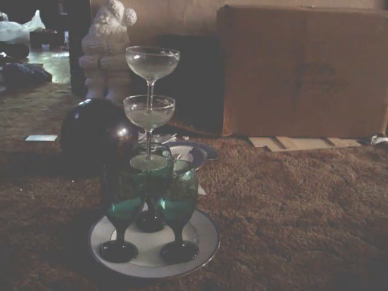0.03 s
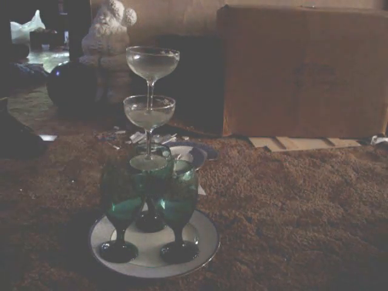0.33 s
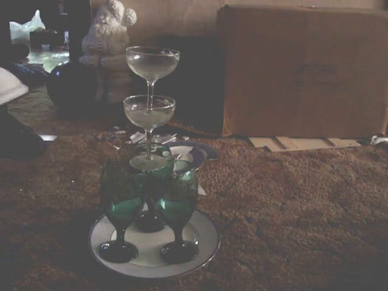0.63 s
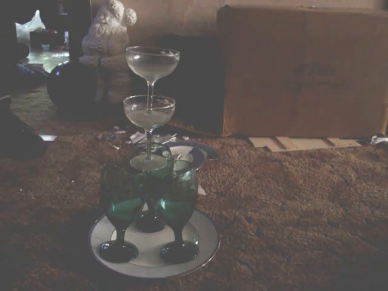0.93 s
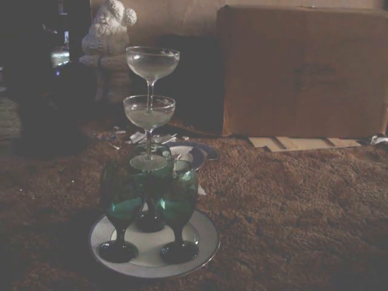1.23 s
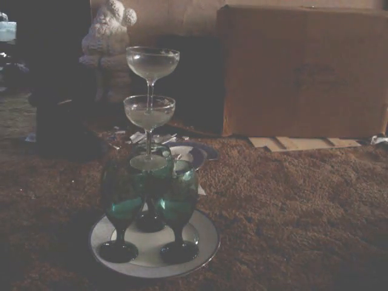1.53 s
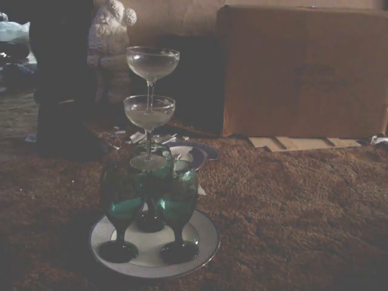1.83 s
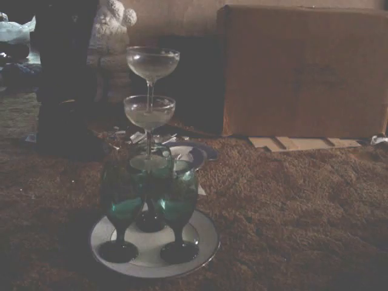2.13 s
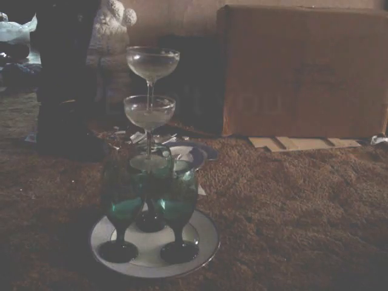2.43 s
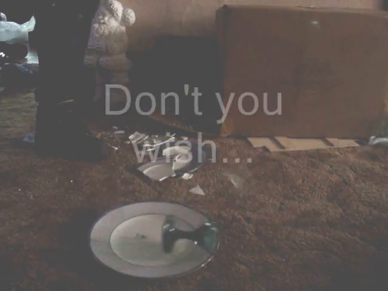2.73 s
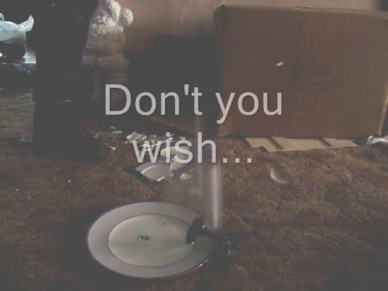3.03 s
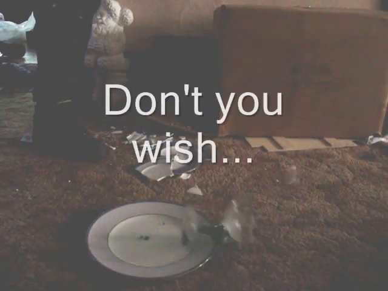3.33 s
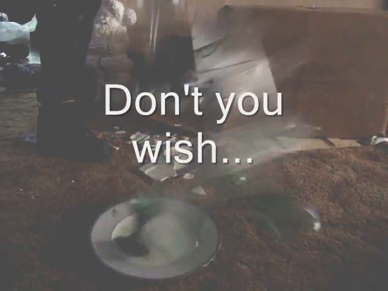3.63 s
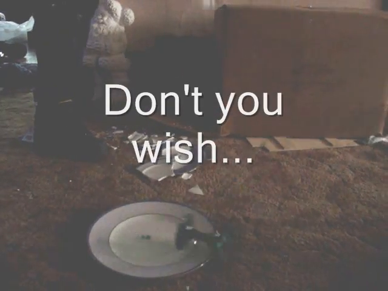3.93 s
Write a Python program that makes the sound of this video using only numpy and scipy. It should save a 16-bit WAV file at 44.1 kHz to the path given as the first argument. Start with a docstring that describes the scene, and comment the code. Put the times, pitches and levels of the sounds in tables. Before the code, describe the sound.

Glasses shatter loudly on a plate in a small, dry room, following a quiet stretch with light knocks and rustling. Ringing glass, splinters and dull thuds distort the microphone, then stop abruptly before the same smash repeats.

```python
"""A quiet, carpeted room: a soft knock and a shuffle, then a heavy blow scatters a stack of drinking
glasses on a plate. The glasses collide and ring in their own modes, shards ping, splinters shower
down as tiny damped rings, and heavy pieces thud onto carpet and plate. The smash overloads the
microphone; it is then cut off and starts again from the blow."""
import sys
import numpy as np
from scipy import signal
from scipy.fft import rfft, irfft, next_fast_len
from scipy.io import wavfile
from scipy.ndimage import map_coordinates

SR = 44100
rng = np.random.default_rng(int(sys.argv[2]) if len(sys.argv) > 2 else 0)


def wrap_up_sound(samples):
    """Save the sound to the file named by the first command line argument, as 16-bit audio."""
    columns = np.atleast_2d(samples).T
    # keep every value between -1 and 1, then stretch to whole-number steps
    tamed = np.clip(columns, -1, 1)
    steps = np.round(tamed * 32767).astype(np.int16)
    wavfile.write(sys.argv[1], SR, steps)


N = 176400

BLOW_S, CUT_S, TOP_HZ = 2.6243, 3.6625, 16000
RING_RISE_S, THUD_RISE_S = .0006, .004
CLICK_DB, CLICK_T60_S = -5, .03  # the hard edge of a contact, relative to its level
CHATTER, SHARD_CHATTER, CHATTER_PER_S = .34, .55, 115  # depths and rate of the rattle in a ring

# The bright crack of glass, also heard in every click. Each row: frequency in Hz, level in dB.
CRACK_COLOUR = [(40, -10), (1000, -3), (7000, 1), (15000, -2)]
# The low push of air under it. Each row: frequency in Hz, level in dB.
PUFF_COLOUR = [(30, 0), (70, -7), (200, -15), (800, -28)]


def blow():
    """A light touch, then the crash that breaks the stack, with a low push of air."""
    touch = strike(2.62, db=-20, rise=THUD_RISE_S, t60=.09)
    crash = strike(BLOW_S, db=0, rise=RING_RISE_S, t60=.09)
    puff = strike(BLOW_S, db=-20, rise=THUD_RISE_S, t60=.35)
    return (touch + crash) * noise(CRACK_COLOUR) + puff * noise(PUFF_COLOUR)


# The voice of each glass. Each row: glass number, pitch in Hz, level in dB, 60 dB decay in seconds.
GLASS_MODES = [(0, 937, 0, .28), (0, 2295, -3, .28), (0, 5480, -11, .18), (1, 1760, -1.5, .55),
               (1, 1837, -4, .55), (2, 1005, -5, 1.3), (2, 1175, -2, .65), (2, 2718, -1, .5),
               (2, 3278, -2, .6), (2, 3388, -1, .35), (2, 5048, -5, .24), (2, 6062, -4, .45),
               (2, 8370, -9, .35), (3, 2531, -1, .45), (3, 3285, -7, .3), (3, 4067, -1, .35),
               (4, 1440, -14, 1.1), (4, 4111, -1, .17), (4, 7175, -9, .2), (5, 2837, -5, .45),
               (5, 2877, -1, .55), (5, 2992, -11, .6), (5, 4320, 1, .3), (5, 7612, -10, .25),
               (5, 7845, -9, .25)]
# The collisions. Each row: start in seconds, glass number, level in dB.
CLINKS = [(2.653, 3, -9), (2.665, 0, -3), (2.70, 0, -3), (2.705, 3, -10), (2.745, 1, -4), (2.745, 5, -8),
          (2.771, 0, -2), (2.79, 5, -12), (2.809, 1, -10), (2.8223, 3, -14), (2.885, 2, -14),
          (2.905, 1, -11), (2.9615, 2, -15), (2.985, 1, -14), (3.04, 2, -21), (3.358, 5, -15),
          (3.365, 2, -21), (3.3935, 4, -16), (3.3935, 5, -18), (3.4535, 5, -18), (3.4535, 2, -23),
          (3.47, 1, -15), (3.48, 3, -17), (3.5672, 4, -6), (3.5672, 2, -17), (3.5672, 3, -19),
          (3.6361, 4, -16), (3.6361, 2, -22)]


def glasses():
    """Every contact clicks and feeds the modes of its glass; rattling roughens the high ones most."""
    def envelope(glass, db, t60):
        hits = [strike(s, db + level, RING_RISE_S, t60) for s, struck, level in CLINKS if struck == glass]
        return np.sqrt(sum(hit ** 2 for hit in hits))  # hits add in energy
    notes = sum(envelope(glass, db, t60) * ring(hz, CHATTER * np.sqrt(hz / 4000))
                for glass, hz, db, t60 in GLASS_MODES)
    stack = sorted({row[0] for row in GLASS_MODES})
    sparkle = sum(envelope(glass, db=-14, t60=.7) * overtones() for glass in stack)
    clicks = sum(strike(s, db + CLICK_DB, RING_RISE_S, CLICK_T60_S) for s, _, db in CLINKS)
    return notes + sparkle + clicks * noise(CRACK_COLOUR)


def ring(hz, chatter):
    """One mode: it wavers as the piece tumbles and turns rough as it rattles."""
    tumble_per_s, tumble_db, wander_rad = 28, 1.7, .55
    phase = 2 * np.pi * hz * np.arange(N) / SR + wander_rad * wobble(tumble_per_s)
    note = (1 + chatter * wobble(CHATTER_PER_S)) * np.sin(phase)
    note += chatter * wobble(CHATTER_PER_S) * np.cos(phase)
    return note * amp(tumble_db * wobble(tumble_per_s)) / np.sqrt(1 + 2 * chatter ** 2)


def overtones(count=18, low_hz=4700):
    """The crowd of high, unevenly spaced modes in one piece of glass, at rms 1."""
    hz = low_hz + (TOP_HZ - low_hz) * (np.arange(count) + rng.random(count)) / count
    lines = np.zeros(N // 2 + 1, complex)
    lines[(hz * N / SR).astype(int)] = (.5 + rng.random(count)) * np.exp(2j * np.pi * rng.random(count))
    return unit(irfft(lines, N) * (1 + SHARD_CHATTER * wobble(CHATTER_PER_S)))


# Loose shards. Each row: start in seconds, pitch in Hz, level in dB, 60 dB decay in seconds.
SHARD_PINGS = [(2.6245, 7990, 4, .06), (2.626, 3000, 5, .06), (2.6528, 5540, 2, .12), (2.69, 5600, -1, .12),
               (2.8223, 6200, -2, .008), (2.8851, 5050, -1, .04), (2.905, 8370, -13, .2),
               (3.1412, 7050, -12, .24), (3.1412, 6640, -14, .25), (3.2, 7030, -15, .1),
               (3.2155, 6900, 1, .015), (3.2548, 7000, -15, .03), (3.3108, 6020, -9, .08),
               (3.3108, 2300, -19, .3), (3.3582, 7600, 0, .035), (3.3935, 9880, -7, .12),
               (3.3935, 5585, -10, .08), (3.5037, 6730, -7, .05), (3.531, 9890, -13, .11)]


def shards(overtone_db=-13):
    """A shard clicks and gives one short, rough, high note with overtones."""
    pings = sum(strike(s, db, RING_RISE_S, t60) * (ring(hz, SHARD_CHATTER) + amp(overtone_db) * overtones())
                for s, hz, db, t60 in SHARD_PINGS)
    clicks = sum(strike(s, db + CLICK_DB, RING_RISE_S, CLICK_T60_S) for s, _, db, _ in SHARD_PINGS)
    return pings + clicks * noise(CRACK_COLOUR)


# Heavy pieces hitting carpet or plate. Each row: start in seconds, pitch in Hz, level in dB.
LANDINGS = [(2.625, 230, -3), (2.815, 510, -2), (2.862, 190, -6), (2.872, 545, 1), (2.949, 360, -2),
            (3.088, 440, -7), (3.222, 240, -1), (3.264, 350, -4), (3.298, 250, -6)]
# The plate's ring. Each row: pitch in Hz, level in dB relative to the landing, 60 dB decay in seconds.
PLATE_MODES = [(500, -19, .5), (572, -19, .35)]


def thuds(scuff_db=-3):
    """A landing is a low, damped note with a scuff of noise around it; the plate rings on after it."""
    t, out = np.arange(N) / SR, np.zeros(N)
    for s, hz, db in LANDINGS:
        body = .5 * np.sin(2 * np.pi * hz * (t - s))
        scuff = noise([(hz / 4, -26), (hz / 2, -3), (hz, 0), (hz * 2, -6), (hz * 8, -27)])
        out += strike(s, db, THUD_RISE_S, t60=.07) * (body + amp(scuff_db) * scuff)
    for hz, level, t60 in PLATE_MODES:
        energy = sum(strike(s, db + level, THUD_RISE_S, t60) ** 2 for s, _, db in LANDINGS)
        out += np.sqrt(energy) * ring(hz, CHATTER)
    return out


# The shower's fader moves. Each row: time in seconds, bright spray in dB, dull clatter in dB.
DEBRIS_LEVELS = [(2.625, -5, -14), (2.70, -4, -17), (2.76, -11, -20), (2.83, -13, -18), (2.96, -17, -21),
                 (3.09, -18, -17), (3.17, -19, -24), (3.24, -25, -22), (3.38, -16, -26), (3.52, -18, -27),
                 (3.66, -23, -32)]
# Crisp splinters, sizzling dust and mid-range clatter. Each row: frequency in Hz, level in dB.
SPLINTER_COLOUR = [(900, -10), (1800, -4), (4200, -2), (5600, 3), (15000, 0)]
DUST_COLOUR = [(1000, -24), (3000, -5), (6000, 0), (15500, 1)]
CLATTER_COLOUR = [(60, -34), (200, -15), (480, -1), (1300, 2), (2500, -3), (5000, -12)]


def debris(dust_db=-6):
    """Splinters and duller clatter shower down; the finest fragments merge into a sizzle."""
    times, spray_db, clatter_db = np.transpose(DEBRIS_LEVELS)
    t = np.arange(N) / SR
    shower_gain = np.sqrt((CUT_S - BLOW_S) * SR / N)  # rms 1 while the grains fall
    splinters = grains(per_s=1900, cycles=160, spread_db=2.8, lo_hz=1500, hi_hz=15500)
    spray = shower_gain * coloured(splinters, SPLINTER_COLOUR) + amp(dust_db) * noise(DUST_COLOUR)
    spray *= amp(np.interp(t, times, spray_db)) / np.hypot(1, amp(dust_db))
    chips = grains(per_s=1500, cycles=14, spread_db=2, lo_hz=130, hi_hz=3500)
    clatter = shower_gain * coloured(chips, CLATTER_COLOUR) * amp(np.interp(t, times, clatter_db))
    return (t > BLOW_S) * (spray + clatter)


def grains(per_s, cycles, spread_db, lo_hz, hi_hz, size=2048):
    """Tiny rings of random pitch and strength, each damped over roughly `cycles` cycles."""
    span_s, n = CUT_S - BLOW_S, np.arange(size)
    draws = np.random.default_rng(rng.integers(2 ** 30)).random((int(per_s * span_s), 4))
    when, pitch, force, length = np.hsplit(draws, 4)
    start = ((BLOW_S + when * span_s) * SR).astype(int)
    hz = lo_hz * (hi_hz / lo_hz) ** pitch
    strength = amp(-spread_db * np.log(np.maximum(force, .02)))
    turns = hz * n / SR
    decay = amp(-60 * turns / (cycles * (.5 + length))) * (1 - n / size)
    rings = strength * np.sin(2 * np.pi * turns) * decay
    return np.bincount((start + n).ravel(), rings.ravel(), N)[:N]


# A dry, furnished room. Each row: frequency in Hz, 60 dB decay in seconds.
ROOM_DECAY = [(150, .25), (1000, .35), (14000, .25)]


def room_reverb(x):
    """Reflections blur into a short noise tail that lasts longest in the mids."""
    hz, t, spectrum = signal.stft(rng.standard_normal(SR // 2), SR, nperseg=256)
    decay = amp(-60 * t / along(ROOM_DECAY, hz)[:, None])
    tail = signal.istft(spectrum * decay, SR, nperseg=256)[1]
    predelayed = np.pad(tail, (SR // 300, 0))
    return signal.fftconvolve(x, predelayed / np.linalg.norm(tail))[:N]


# Soft knocks and light rustles. Each row: start in seconds, level in dB, rise and 60 dB decay in seconds.
KNOCKS = [(.064, -31, .002, .22), (.135, -36, .02, .25), (.302, -42, .005, .2), (.335, -37, .01, .1),
          (2.56, -43, .03, .5)]
RUSTLES = [(0, -52, .002, 1.5), (.066, -43, .001, .4), (.325, -46, .001, .1), (1.41, -52, .02, .4),
           (1.58, -56, .005, .15)]
# Boxy knocks, airy rustles and a low bed of room tone. Each row: frequency in Hz, level in dB.
KNOCK_COLOUR = [(40, -16), (250, -2), (550, 1), (1000, -6), (2300, -11), (8500, -28), (15000, -34)]
RUSTLE_COLOUR = [(300, -3), (3000, 0), (15000, -4)]
ROOM_TONE = [(25, -21), (65, -4), (200, 0), (370, 1), (700, -5), (1400, -10), (3000, -16), (9500, -20),
             (15000, -26)]


def background(tone_db=-52.7):
    """Room tone, with someone moving about: short bursts of dull and airy noise."""
    knocks = sum(strike(*row) for row in KNOCKS) * noise(KNOCK_COLOUR)
    rustles = sum(strike(*row) for row in RUSTLES) * noise(RUSTLE_COLOUR)
    return amp(tone_db) * noise(ROOM_TONE) + knocks + rustles


def strike(s, db, rise, t60):
    """Envelope that rises at second s and falls 60 dB every t60 seconds."""
    env, start = np.zeros(N), round(s * SR)
    t = np.arange(min(N - start, SR)) / SR
    env[start:start + len(t)] = amp(db - 60 * t / t60) * (1 - np.exp(-t / rise))
    return env


def wobble(rate, size=4096):
    """A smooth random curve, rate knots a second."""
    positions = np.linspace(0, rate * N / SR, size)
    coarse = map_coordinates(rng.standard_normal(size), [positions], mode="wrap")
    return np.interp(np.arange(N), np.linspace(0, N, size), coarse)


def amp(db):
    """Decibels to gain."""
    return 10 ** (np.asarray(db) / 20)


def unit(x):
    """Scale to rms 1."""
    return x / np.sqrt(np.mean(x ** 2) + 1e-20)


def along(points, hz):
    """(Hz, value) points read on a log axis."""
    knots_hz, values = np.transpose(points)
    return np.interp(np.log(hz + 1), np.log(knots_hz + 1), values)


def filtered(x, response):
    """x times a gain that depends on frequency."""
    size = next_fast_len(N + SR // 2)
    return irfft(rfft(x, size) * response(np.fft.rfftfreq(size, 1 / SR)), size)[:N]


def coloured(x, colour):
    """x through an EQ curve of (Hz, dB) points, at rms 1."""
    return unit(filtered(x, lambda hz: amp(along(colour, hz))))


def noise(colour):
    """Coloured noise of rms 1."""
    return coloured(rng.standard_normal(N), colour)


def scene():
    """The smash and its reverb over the quiet room, in mono."""
    smash = blow() + glasses() + shards() + thuds() + debris()
    return (smash + amp(-10) * room_reverb(smash) + background())[None]


def overload(x, limit_s=.015, makeup_db=1.5, hardness=5):
    """A fast limiter ducks the loud moments, and the remaining peaks saturate."""
    pole = np.exp(-1 / (limit_s * SR))
    power = signal.lfilter([1 - pole], [1, -pole], x ** 2)
    limited = amp(makeup_db) * x / np.sqrt(1 + power)
    return limited / (1 + np.abs(limited) ** hardness) ** (1 / hardness)


def retrigger(x, resume_s=3.7335, delay_s=1.11457, pause_db=-44):
    """The smash is cut off; after a moment of room tone it starts again from the blow."""
    t = np.arange(N) / SR
    pause = amp(pause_db) * noise(ROOM_TONE)
    repeat = np.roll(x, round(delay_s * SR))
    return np.where(t < CUT_S, x, np.where(t < resume_s, pause, repeat))


def record(dry):
    """A dull-topped microphone overloads; then come the retrigger and a brick-wall low-pass."""
    shelf_db, edge_hz, width_hz = -9, 9850, 350
    dulled = filtered(dry[0], lambda hz: amp(shelf_db * np.clip((hz - edge_hz) / width_hz, 0, 1)))
    return filtered(retrigger(overload(dulled)), lambda hz: 1 / (1 + (hz / TOP_HZ) ** 200))[None]


dry = scene()
out = record(dry)
wrap_up_sound(out)
```